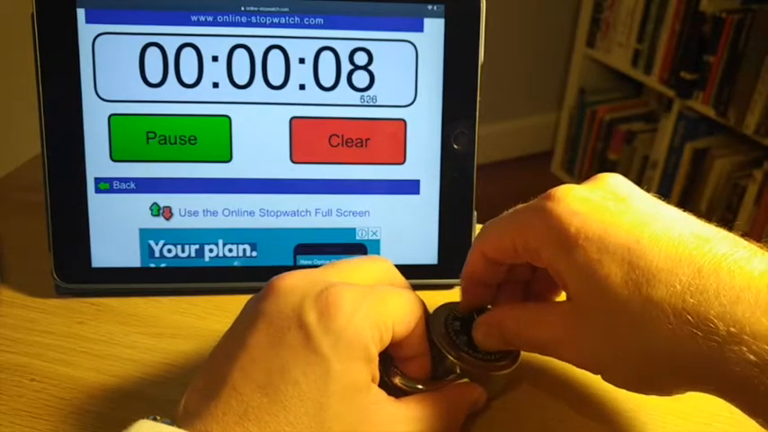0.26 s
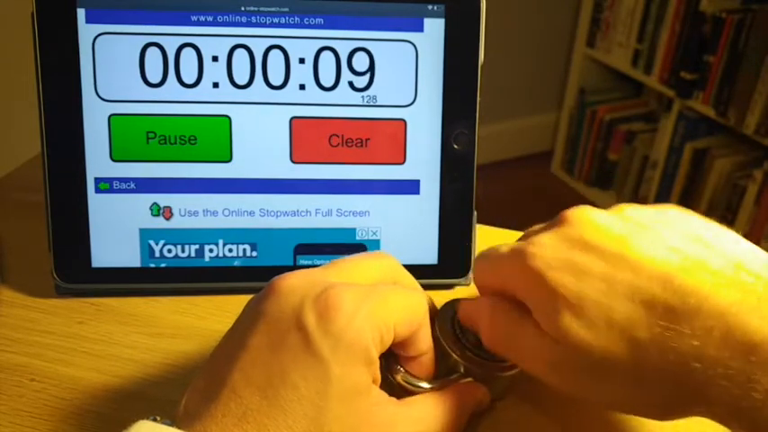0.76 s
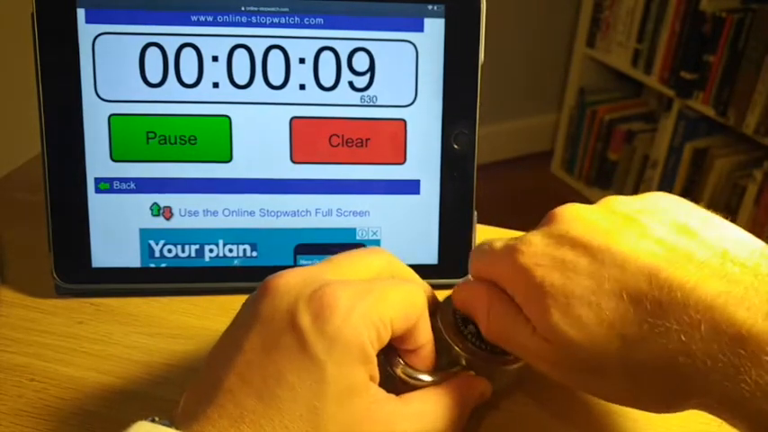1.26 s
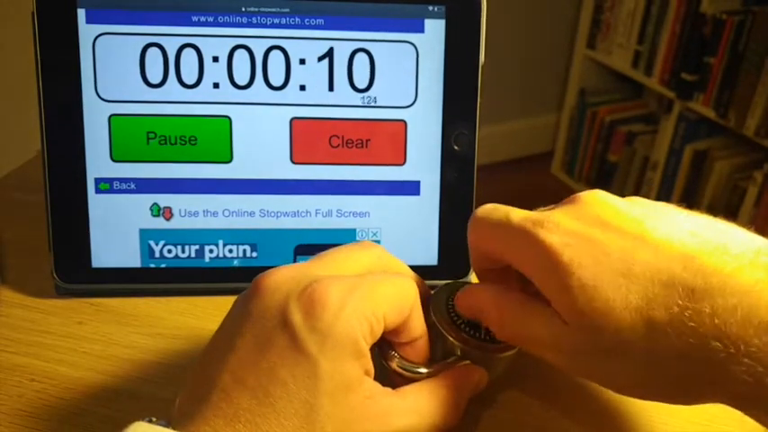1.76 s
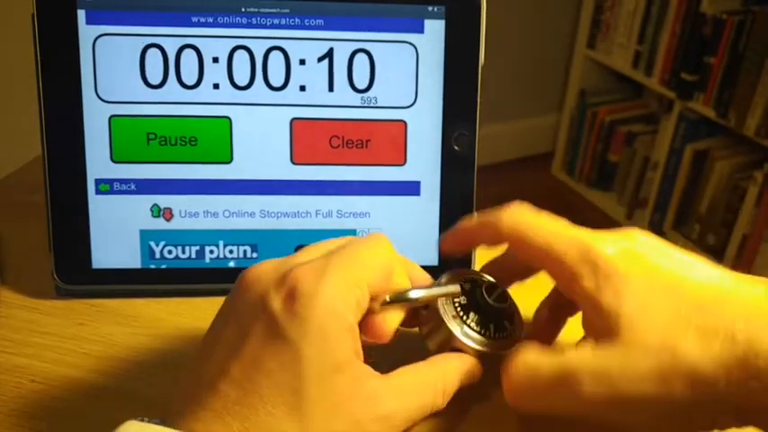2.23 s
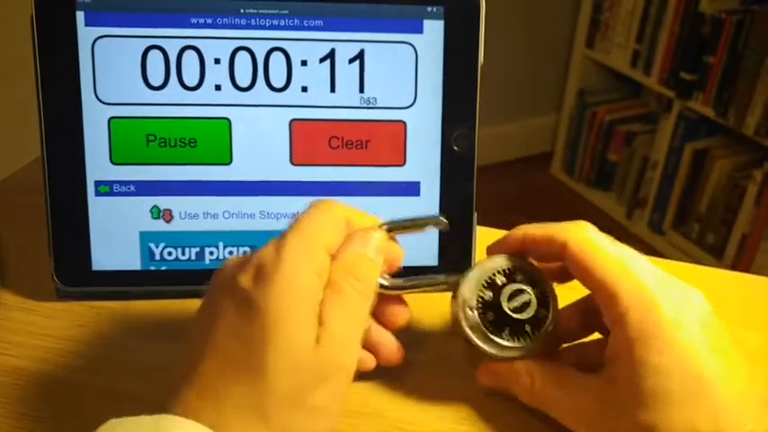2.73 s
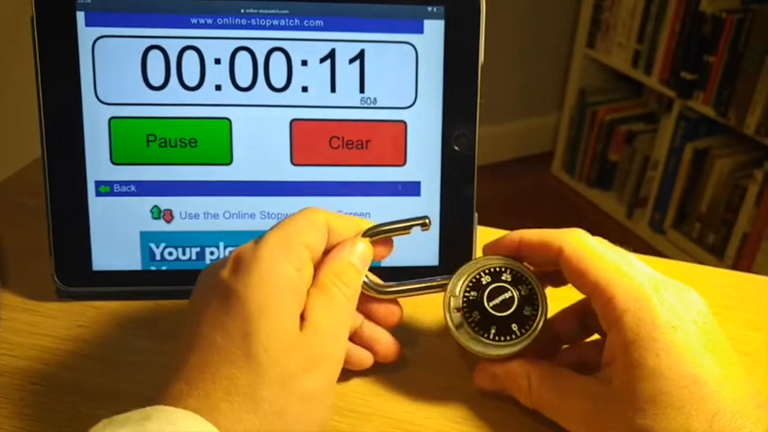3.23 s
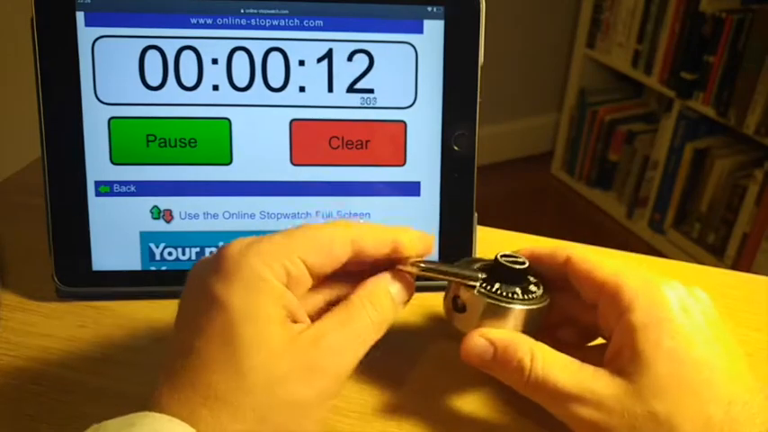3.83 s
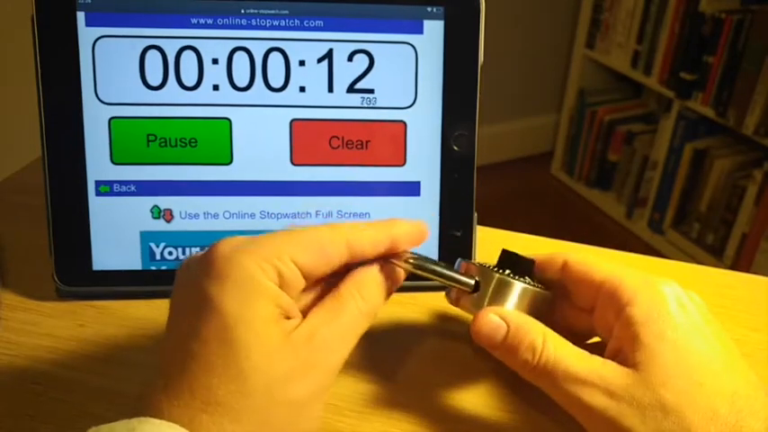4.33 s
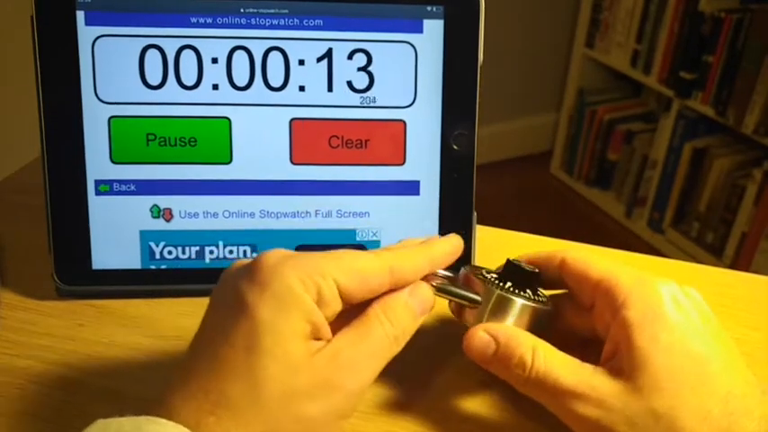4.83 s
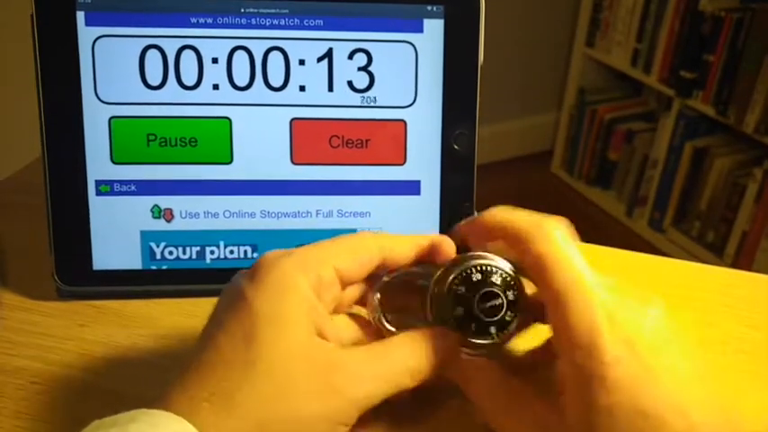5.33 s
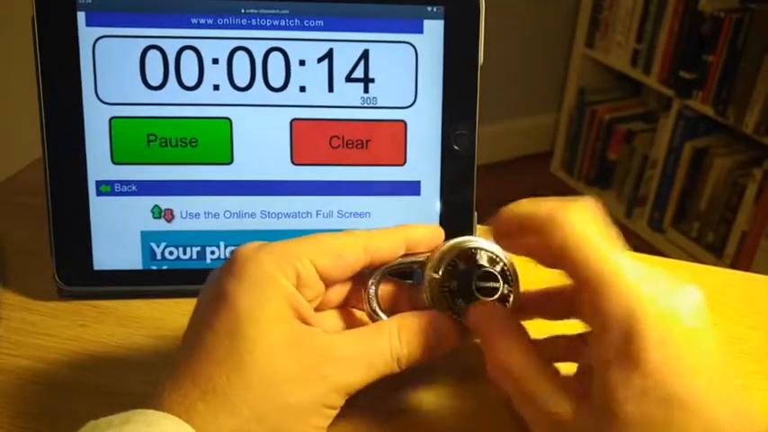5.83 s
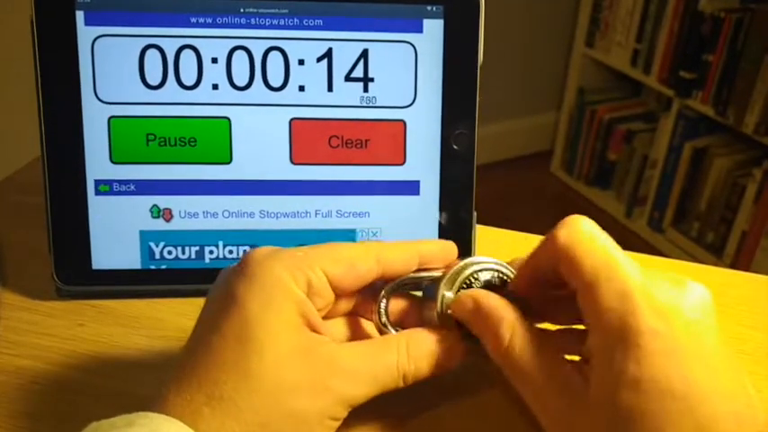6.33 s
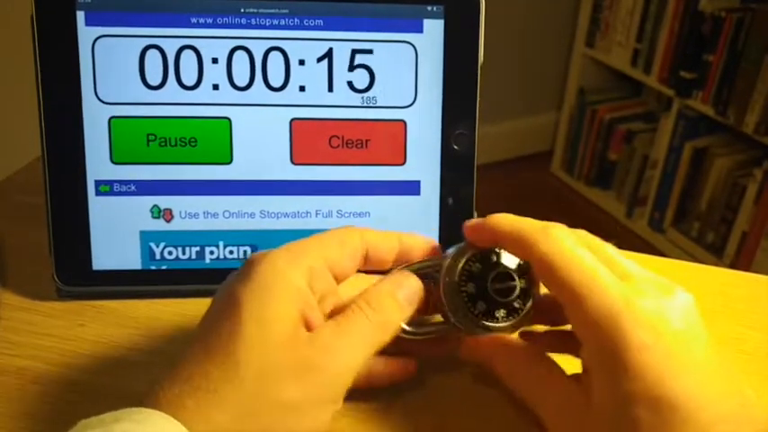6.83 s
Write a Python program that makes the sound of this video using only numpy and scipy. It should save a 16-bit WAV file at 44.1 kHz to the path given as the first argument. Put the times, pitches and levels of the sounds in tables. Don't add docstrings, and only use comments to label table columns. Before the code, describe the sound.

Hands work a combination padlock: dry scrapes, sharp bright clacks, a quiet pause, a ringing tick, a loud snap shut, then busy clicking.

```python
import sys
import numpy as np
from scipy import signal
from scipy.fft import rfft, irfft, next_fast_len
from scipy.io import wavfile
from scipy.ndimage import uniform_filter1d, map_coordinates

SR = 44100
rng = np.random.default_rng(int(sys.argv[2]) if len(sys.argv) > 2 else 0)


def how_loud(loudness_db):
    steps = np.asarray(loudness_db, float) / 20
    return 10 ** steps


def to_wav(s):
    ch = np.atleast_2d(s).T
    pcm = np.round(np.clip(ch, -1, 1) * 32767)
    wavfile.write(sys.argv[1], SR, pcm.astype(np.int16))


N = 312223
TIME = np.arange(N) / SR


def unit(x):
    return x / np.sqrt(np.mean(x ** 2) + 1e-20)


def peak(x):
    return x / np.abs(x).max()


def along(points, hz):
    f, value = np.transpose(points)
    return np.interp(np.log(hz + 1), np.log(f + 1), value)


def over_time(points):
    s, value = np.transpose(points)
    return np.interp(TIME, s, value)


def filtered(x, response):
    n = x.shape[-1]
    padded = next_fast_len(n + 4096)
    spectrum = rfft(x, padded) * response(np.fft.rfftfreq(padded, 1 / SR))
    return irfft(spectrum, padded)[..., :n]


def shaped(x, points):
    return filtered(x, lambda hz: how_loud(along(points, hz)))


def resonances(peaks):
    def response(f):
        total = 0
        for k, (center, width, db) in enumerate(peaks):
            ring = 1j * f * width / (center ** 2 - f ** 2 + 1j * f * width)
            total = total + (-1) ** k * how_loud(db) * ring
        return total
    return response


def strokes(rows):
    out = np.zeros(N)
    for s, rise, t60, db in rows:
        part = out[round(s * SR):round((s + rise + 2 * t60) * SR)]
        t = np.arange(len(part)) / SR
        fall_db = -60 * np.clip(t - rise, 0, None) / t60
        part += how_loud(db + fall_db) * np.clip(t / rise, 0, 1)
    return out


# f/Hz, likeness (1 same, 0 unrelated)
LIKENESS = [(60, 0.76), (180, 1), (550, 0.097), (1650, -0.47), (4970, -0.0021), (15000, -0.15)]


def pair(spectrum):
    def spread(hz):
        turn = np.arccos(np.clip(along(LIKENESS, hz), -1, 1)) / 2
        return spectrum(hz) * [np.cos(turn), np.sin(turn)]
    mid, side = filtered(rng.standard_normal((2, N)), spread)
    return unit(np.array([mid + side, mid - side]))


# f/Hz, level/dB (per Hz)
AIR = [(15, -72), (25, -38.5), (38, -13), (103, -5.5), (187, -12.5), (226, -9.5), (259, -16), (330, -19.5),
       (524, -24), (617, -26), (1510, -31.5), (3200, -37), (6730, -37), (15200, -32.5), (16500, -53.5)]
# f/Hz, width/Hz, level/dB
HUM = [(101.6, 12, -69), (184, 12, -75.5)]
# f/Hz, width/Hz, level/dB
MOTOR = [(108, 2.5, -71), (220.7, 1, -68.5), (330, 1.5, -81)]


def air():
    out = how_loud(-61) * pair(lambda hz: how_loud(along(AIR, hz)))
    for center, width, db in HUM + MOTOR:
        out += how_loud(db) * pair(lambda f: 1 / (1 + ((f - center) / width) ** 4))
    return out


# f/Hz, t60/s
ROOM_DECAY = [(200, 0.59), (700, 0.59), (1800, 0.74), (4800, 0.79), (12000, 0.49)]
# f/Hz, level/dB
ROOM_SHARE = [(300, -8), (1000, -5.5), (2000, -7.5), (4000, -12), (8000, -14.5), (15000, -10.5)]


def room(x, count=12):
    out = np.zeros((2, N + 2 * SR))
    step = N // count + 1
    x = shaped(x, ROOM_SHARE)
    for at in range(0, N, step):
        hz, t, z = signal.stft(rng.standard_normal((2, SR)), SR, nperseg=256)
        decay = how_loud(-60 * t / along(ROOM_DECAY, hz)[:, None])
        tail = signal.istft(z * decay, SR, nperseg=256)[1]
        tail *= 1 - np.exp(-np.arange(tail.shape[1]) / SR / 0.005)
        tail /= np.linalg.norm(tail[0])
        wet = signal.fftconvolve(x[None, at:at + step], tail, axes=1)
        out[:, at:at + wet.shape[1]] += wet
    return out[:, :N]


# t/s, rise/s, fall t60/s, level/dB
SLEEVE = [(2.79, 0.074, 2.1, -62)]
# f/Hz, level/dB (per Hz)
CLOTH = [(500, -10), (1500, 1.5), (3000, -3.5), (7000, -11.5), (16000, -23)]


def sleeve():
    return strokes(SLEEVE) * pair(lambda hz: how_loud(along(CLOTH, hz)))


# t/s, level/dB, f/Hz, t60/s
THUDS = [
    (0.365, -59, 303, 0.061),
    (1.173, -44, 180, 0.13),
    (1.981, -21.5, 194, 0.03),
    (2.566, -46, 215, 0.15),
    (2.642, -54, 202.4, 0.074),
    (4.598, -10, 165.7, 0.038),
    (5.061, -18, 201, 0.023),
    (7.006, -33.5, 206, 0.045),
    (7.049, -19, 241, 0.043),
]


def thuds():
    out = np.zeros(N + SR)
    t = np.arange(SR // 2) / SR
    for s, db, hz, t60 in THUDS:
        boom = np.sin(2 * np.pi * hz * t)
        boom += 0.082 * np.sin(2 * np.pi * 1.9 * hz * t) * how_loud(-60 * t / 0.03)
        out[round(s * SR):][:len(t)] += how_loud(db - 60 * t / t60) * (1 - np.exp(-t / 0.011)) * boom
    return out[:N]


def cupped(s):
    return (s < 2.2) | (s > 5.28)


def shut(s):
    return (s < 2.5) | (s > 4.5)


def opened(hz):
    u = 1j * hz / 960
    return (u * u / (1 + 1.49 * u + u * u)) ** 2


# (f/Hz, width/Hz, level/dB)
FREE_HOLLOW, CUPPED_HOLLOW = (1054, 140, -8), (846, 250, -6)


def patchy(x):
    z = signal.stft(x, nperseg=512)[2]
    field = rng.standard_normal(z.shape[1:])
    field = uniform_filter1d(field, size=7, axis=0)
    field = uniform_filter1d(field, size=6, axis=1)
    wander = how_loud(2.5 * unit(field))
    return unit(signal.istft(z * wander, nperseg=512)[1][:, :N])


# t/s, pressure/dB
PRESSURE = [(0.2, -67.5), (0.45, -57.5), (1.31, -55.5), (1.58, -64), (1.85, -73.5), (2.0, -53.5),
            (2.21, -61.5), (3.4, -73), (3.67, -59), (3.8, -74), (4.11, -77), (4.45, -73), (4.76, -99),
            (4.86, -59), (6.12, -57), (6.4, -63), (6.73, -63), (7.08, -60)]
# t/s, rise/s, fall t60/s, hiss level/dB
SLIDES = [(0.266, 0.052, 0.33, -36.5), (.38, 0.016, 0.2, -58), (.668, 0.013, 0.63, -44.5),
          (1.081, 0.017, 0.1, -44.5), (1.1647, 0.0081, 0.067, -28.5), (1.809, 0.011, 0.3, -35),
          (1.925, 0.015, 0.32, -49.5), (1.967, 0.0081, 0.022, -36), (1.98, 0.0078, 0.12, -70),
          (2.6, 0.052, 0.38, -71), (3.47, 0.031, 0.17, -74.5), (3.624, 0.093, 0.26, -48),
          (3.8, 0.039, .15, -57), (3.896, 0.023, 0.25, -42.5), (4.082, 0.018, 0.022, -35),
          (4.238, 0.0017, 0.037, -27.5), (4.583, 0.013, 0.046, -20), (4.606, 0.0048, 0.27, -30),
          (4.64, 0.055, 0.7, -42.5), (5.275, 0.027, 0.14, -46.5), (5.578, 0.0068, 0.13, -42),
          (5.93, 0.041, 0.026, -43.5), (6.2, 0.063, 0.074, -49.5), (6.468, 0.015, 0.24, -48),
          (6.66, .015, 0.17, -53), (6.9, 0.056, .1, -50), (6.999, 0.0077, 0.046, -31)]
# t/s, rise/s, fall t60/s, level/dB
DRAGS = [
    (.27, 0.052, 0.088, -39),
    (.67, 0.034, 0.085, -43.5),
    (.315, 0.021, 0.055, -39.5),
    (3.63, 0.047, 0.3, -48.5),
    (3.895, 0.011, 0.16, -43),
    (4.238, 0.012, 0.065, -36.5),
    (5.57, 0.03, 0.1, -55),
    (6.24, 0.021, 0.11, -59),
    (6.46, 0.043, 0.54, -61),
]
# t/s, rise/s, fall t60/s, level/dB
SCUFFS = [(0.263, 0.049, 0.15, -39.5), (0.355, 0.0067, 0.11, -33.5), (.555, 0.019, 0.1, -48),
          (.61, 0.0081, 0.36, -52), (.42, 0.028, 0.27, -52.5), (1.649, 0.031, 0.59, -66),
          (1.967, 0.014, 0.023, -51), (2.5, 0.069, 0.35, -67), (4.606, 0.0056, 0.099, -51),
          (5.275, 0.023, 0.061, -62), (5.93, 0.012, 0.056, -55), (6.468, 0.0093, 0.23, -58),
          (7.041, 0.016, 0.062, -45)]
# f/Hz, level/dB (per Hz)
HISS = [(1940, -14), (3300, -7.5), (4090, -8.5), (4560, -2), (5110, -0.5), (7350, -2), (9250, 1.5),
        (11700, -8.5), (14000, -4.5), (15800, -12), (16500, -49)]
# f/Hz, level/dB (per Hz)
GRIND = [(500, -49.5), (650, -18), (800, -8.5), (1050, -10), (1400, -5.5), (1800, -0.5), (2050, -8),
         (2300, -26.5), (3400, -17), (5000, -34.5)]
# f/Hz, width/Hz, level/dB
WOOD = [(215, 180, -1), (434, 50, 6.5), (540, 93, 3), (790, 130, 3.5)]


def rub():
    steady = how_loud(over_time(PRESSURE) - 14) * (TIME > PRESSURE[0][0])
    slides = strokes(SLIDES)
    hiss_gain = steady + slides
    grind_gain = how_loud(3) * steady + how_loud(-11.5) * slides + strokes(DRAGS)

    clump = map_coordinates(rng.standard_normal(N // 150 + 4), [np.arange(N) / 150])
    slip_size = how_loud(2 * clump + 6.7 * rng.standard_normal(N))
    slips = rng.standard_normal((3, 2, N)) * slip_size

    hiss = shaped(slips[0], HISS)
    grind = unit(shaped(slips[1], GRIND))
    hollow = filtered(grind, resonances([(*CUPPED_HOLLOW[:2], 0)]))
    grind = grind + how_loud(-15.5) * cupped(TIME) * hollow
    grind = np.where(shut(TIME), grind, filtered(grind, opened))
    wood = filtered(filtered(slips[2], resonances(WOOD)), resonances(WOOD))
    return hiss_gain * patchy(hiss) + grind_gain * patchy(grind) + strokes(SCUFFS) * unit(wood)


RING_TIMES = [0.365, 1.165, 1.979, 2.434, 2.466, 3.717, 3.73, 4.096, 4.097, 4.098, 4.595, 4.597, 5.055, 5.7,
              5.89, 6.436, 6.484, 6.774, 6.778]
# f/Hz, level/dB, t60/s
RINGS = [(785, -39, .08), (1832, -31.5, 0.11), (925, -45, 0.73), (715, -55, .055), (980, -61, 0.65),
         (1790, -35, 0.043), (9810, -45.5, 0.34), (15250, -36, .28), (790, -32, 0.027), (15350, -16, 0.028),
         (1940, -30, 0.065), (8200, -36, 0.28), (755, -50, .045), (770, -51, 0.054), (755, -46, 0.048),
         (776, -47.5, 0.13), (757, -44, 0.094), (3670, -31, 0.035), (5200, -31, 0.04)]


def rings():
    out = np.zeros(N + SR)
    t = np.arange(SR // 2) / SR
    for s, (hz, db, t60) in zip(RING_TIMES, RINGS):
        cluster = resonances([(hz, 150 + 0.01 * hz, 0)])
        buzz = unit(filtered(filtered(rng.standard_normal(len(t)), cluster), cluster))
        out[round(s * SR):][:len(t)] += how_loud(db - 60 * t / t60) * (1 - np.exp(-t / 0.00093)) * buzz
    return out[:N]


# t/s, level/dB, t60/s
BAR = [
    (3.6565, -27, 0.03),
    (3.908, -40, .05),
    (4.2395, -16, 0.04),
    (4.25, -18, .03),
    (4.2615, -26, 0.03),
    (6.621, -39, 0.024),
]


def bar():
    out = np.zeros(N + SR)
    t = np.arange(SR // 4) / SR
    for s, db, t60 in BAR:
        wobble = np.cumsum(rng.normal(0, 0.11, len(t)))
        tone = np.sin(2 * np.pi * 10590 * t + wobble)
        out[round(s * SR):][:len(t)] += how_loud(db - 60 * t / t60) * (1 - np.exp(-t / 0.00055)) * tone
    return out[:N]


# f/Hz, width/Hz, level/dB
CASE = [(911, 208, -12), (1214, 130, -14), (1826, 227, -6)]
# f/Hz, width/Hz, level/dB
DISCS = [(3650, 160, -5.5), (5135, 160, -6), (5047, 140, 8), (6570, 3250, -1), (7050, 1060, 6)]
# f/Hz, width/Hz, level/dB
PINS = [(9140, 2000, 3.5), (10550, 1700, 5), (12240, 1300, 7.5), (13900, 1600, -0.5), (15780, 1200, 7.5)]


def varied(peaks, chance):
    pitch = 1 + 0.025 * chance[-1]
    return [(f * pitch, width, db + 3 * c) for (f, width, db), c in zip(peaks, chance)]


def clicks(contacts):
    out = np.zeros((2, N + SR))
    lead = 350
    t = (np.arange(SR // 16) - lead) / SR
    after = np.clip(t, 0, None)
    slip = 0.053 * how_loud(60 * np.clip(t, None, 0) / 0.02) * how_loud(-60 * after / 0.0056)
    strike = how_loud(-60 * after / 0.0078) * (1 - np.exp(-after / 0.00089))
    for s, db, knock_db, tick_db, hz in contacts:
        noise = rng.standard_normal((3, 2, len(t)))
        chance = rng.standard_normal((3, 8))
        uneven = np.repeat(rng.standard_normal(len(t) // 40 + 1), 40)[:len(t)]
        chatter = 0.1 * how_loud(6.5 * uneven) * how_loud(-60 * after / 0.033) * (t > 0)
        force = noise * (slip + strike + chatter)

        struck = [(hz, 1000, 1)] + varied(DISCS, chance[0])
        part = peak(filtered(force[0], resonances(struck)))
        tick = peak(filtered(force[1], resonances(varied(PINS, chance[1]))))
        hollow = CUPPED_HOLLOW if cupped(s) else FREE_HOLLOW
        knock = filtered(force[2], resonances([hollow] + varied(CASE, chance[2])))
        if not shut(s):
            knock = filtered(knock, opened)
        sound = part + how_loud(tick_db + 10) * tick + how_loud(knock_db + 3.5) * peak(knock)
        at = round(s * SR) - lead
        out[:, at:at + len(t)] += how_loud(db) * sound
    return out[:, :N]


# t/s, level/dB, case knock/dB, bright tick/dB
LEVER = [(0.6128, -41, 8.5, -4), (0.9377, -28, -15.5, -13), (1.8246, -16.5, -10.5, -21),
         (2.4332, -27, -24, -15), (2.6277, -49.5, -3.5, -8), (2.6866, -49, -5, -22),
         (2.8278, -48, -4, -26.5), (3.383, -55.5, -4, -22), (3.49, -61, 8, -29), (3.531, -62.5, 11, -24),
         (3.7218, -21, -13.5, -3), (3.8819, -39, -18, 8), (3.9078, -22, -21, -11), (4.249, -18.5, -17, -24),
         (4.2623, -21.5, -12.5, -6), (4.3374, -37.5, -2, -40), (5.055, -19, -14, -14),
         (5.2042, -28.5, -16.5, -13), (5.257, -23.5, -16, -15), (5.289, -23.5, -14.5, -7),
         (5.3111, -48, -7, 10), (5.6538, -33.5, -16, -15), (6.435, -17.5, -13.5, -2.5),
         (6.774, -16, -20.5, -11.5), (6.7976, -43, -28, 12), (6.825, -28.5, -17.5, -18),
         (6.9165, -32, -33, -34), (6.9268, -21, -18, -14), (7.003, -22, -40, -11)]
# t/s, level/dB, case knock/dB, bright tick/dB
DISCS_ON_TABLE = [(0.239, -43, 5, -29), (0.3151, -32, -8, 4.5), (0.3243, -32.5, 3, 2),
                  (0.365, -21, -4.5, -5.5), (0.5775, -46.5, -0.5, -4), (0.696, -25, -24, -45.5),
                  (0.768, -39, -24, -6), (1.0067, -22, -15.5, -10.5), (1.0908, -27, -7.5, -25),
                  (1.1757, -5, -21, -12), (1.206, -23.5, -17.5, -27), (1.8237, -30, -13, 0),
                  (1.9327, -32.5, -6.5, -11), (1.9789, -7, -17, -9.5), (1.9832, -25, -40, -6.5),
                  (2.4648, -22.5, -10.5, -19), (3.415, -44.5, -2, -42), (4.029, -20.5, -15, -23),
                  (4.0978, -10.5, -17.5, -9), (4.43, -31.5, -31, -22), (4.554, -24, -9, -10.5),
                  (4.5942, -1, -31, -3.5)]
# t/s, level/dB, case knock/dB, bright tick/dB
DISCS_IN_HAND = [(5.4624, -12, -27, -15.5), (5.4702, -29, -15, -10), (5.5934, -26, -19, -16),
                 (5.6989, -19.5, -16, -12), (5.7364, -51.5, -3, 9), (5.7627, -37, -6.5, -25),
                 (5.864, -38, -17, -11), (5.886, -18, -25.5, -13.5), (5.9861, -30.5, -7, 2.5),
                 (6.1653, -27.5, -22, -19), (6.1786, -35, -5, -1.5), (6.314, -32, -7, -14),
                 (6.335, -27, -11.5, -11), (6.5481, -28.5, -11.5, -29), (6.563, -32, -8, -31),
                 (6.6212, -41.5, -28, -3), (6.66, -37, -29, -13), (6.7782, -28, -14, -9),
                 (6.944, -23.5, -27, -6), (6.9921, -36, -23, 2), (7.038, -29, -32, -8)]
# t/s, level/dB, case knock/dB, bright tick/dB
SHACKLE = [(0.7602, -26, -16, -7), (1.1162, -29.5, -19.5, -27), (1.1806, -12, -43, -28.5),
           (3.6165, -40.5, -9, 0.5), (3.6574, -51, 1, -10), (3.6992, -31, -20, -20),
           (3.7172, -15, -9.5, -17.5), (3.9407, -29, -5, 0), (3.969, -33, -33, -23),
           (4.238, -16.5, -43.5, -7), (6.0485, -29.5, -20, -31), (6.478, -22.5, -17, -9)]
STRUCK_PITCH = [4004, 5040, 4830, 6660]
# t/s, level/dB, case knock/dB, bright tick/dB,
# f/Hz
MORE_CONTACTS = [(0.2826, -38, -2, -1, 9040), (0.2976, -33.5, -19, -6.5, 9150), (0.31, -33, -5.5, -5.5, 5270),
                           (0.334, -37, -3, -10, 5000), (0.5645, -43.5, 3.5, -13, 4900), (0.6862, -31.5, -5, -10, 4430),
                           (0.9325, -41.5, -6, -9, 5390), (1.105, -37.5, -6, -21, 6760), (1.196, -34.5, -16, 5, 9000),
                           (1.846, -26, -10, -16, 4300), (1.9205, -37, -21, -8, 5320), (1.9405, -30, -9, -16, 5100),
                           (1.9555, -38, -1, -9.5, 5700), (3.633, -37, -13, -14, 6500), (3.725, -18.5, -13, -14.5, 6600),
                           (3.846, -48, 4.5, -20, 4400), (3.8785, -45, -17, 1, 6500), (3.899, -40.5, -3, -7, 6540),
                           (4.0885, -33, -30, -3, 10700), (4.0938, -32, -5, 1, 11800), (4.415, -52, -20, -1, 12000),
                           (4.589, -10, -6, -18, 6400), (4.612, -13.5, -26, -6.5, 6600), (5.0585, -25.5, -24, -4, 4420),
                           (5.252, -33, -24, -3, 3860), (5.2763, -40, -6, -13, 3740), (5.283, -27, -16, -14.5, 4600),
                           (5.298, -31, -9, -6, 4600), (5.8895, -44, -22, -7, 4800), (5.989, -22.5, -21, -12, 7600),
                           (6.1625, -28.5, -22, -7, 4500), (6.3375, -35, -20, -16, 4500), (6.4315, -37, -28, -13, 4530),
                           (6.438, -26.5, -24, -5, 3930), (6.446, -41, -4, -15, 4800), (6.455, -40, 1, -15, 4200),
                           (6.4845, -31.5, -5, 0, 4830), (6.939, -28.5, -22, 0.5, 4400), (6.9965, -35, -22, 10.5, 4000),
                           (7.023, -35, -10, -10, 4400),
                           (0.2787, -38, 0, -7, 9300), (0.731, -46, -9, -13.5, 5000), (2.424, -47.5, 5, -25, 4500),
                 (2.543, -56, 2, -25, 4500), (2.736, -55, -3, -25, 4800), (3.605, -58.5, 3, -20, 4980),
                 (3.652, -47, 2, -20, 5000), (3.929, -48, 2, -18, 5000), (3.951, -54, -6, -18, 5000),
                 (4.0982, -17.5, -37, -5, 14600), (4.126, -50, 0, -20, 5000), (4.168, -50, 1, -20, 5030),
                 (4.187, -46, 4, -20, 5000), (4.429, -41, 2.5, -20, 4000), (4.46, -54, 0, -20, 5000),
                 (6.247, -48, 2, -20, 5000), (6.4355, -25, -30, -8.5, 13000), (6.497, -37.5, -6, -11, 5000)]
# t/s, left-right level/dB
PLACE = [(0, 1), (1.2, -2.5), (1.9, -1), (3.2, 3), (3.7, -1.5), (4.2, 0), (4.6, -1.5), (5.5, 0), (6.3, 0),
         (7.08, 1)]
# f/Hz, left-right level/dB
TILT = [(60, 12.5), (240, -0.5), (950, 2.5), (3770, 1), (8000, -2), (15000, 6)]
# f/Hz, lead/radians
LEAD = [(150, 0.079), (600, 0.25), (1500, 0.42), (2700, 2), (5000, 1.01), (8000, 1.87), (11600, 1.47),
        (15000, 3.3)]
# f/Hz, level/dB
APART = [(200, -34), (700, -8), (2000, -9.5), (6000, -19), (10000, -16), (14000, -0.5)]


def scene():
    contacts = []
    for rows, pitch in zip([LEVER, DISCS_ON_TABLE, DISCS_IN_HAND, SHACKLE], STRUCK_PITCH):
        contacts += [(*row, pitch) for row in rows]
    lock, faces = clicks(contacts + MORE_CONTACTS) + rub()
    lock = lock + rings() + bar()

    half = np.array([[0.5], [-0.5]])
    left_right = 2 * half

    def ports(hz):
        return how_loud(half * along(TILT, hz)) * np.exp(1j * half * along(LEAD, hz))

    apart = left_right * shaped(faces, APART)
    near = filtered((lock + apart) * how_loud(half * over_time(PLACE)), ports)
    table = thuds()
    mid, side = room(0.8 * lock + 0.71 * np.roll(faces, 130) + 1.85 * table)
    side = left_right * filtered(side, lambda hz: 1 / (1 + (450 / (hz + 1)) ** 2))
    return near + table + mid + side + air() + sleeve()


def low_pass(x):
    return signal.sosfilt(signal.butter(12, 16970, fs=SR, output="sos"), x)


# f/Hz, level/dB
PORT_COLOUR = [(2000, -2), (2400, 1.5), (3350, 2), (3600, 6.5), (4000, 2), (4150, 3.5), (4350, 0.5),
               (7000, -2), (7500, 4), (8100, 0), (15500, -3)]
# f/Hz, width/Hz, depth (0-1)
DIPS = [(3530, 320, 0.3), (4080, 143, 0.43), (7423, 500, 0.8), (12950, 700, .3)]


def record(dry):
    def ports(f):
        response = how_loud(along(PORT_COLOUR, f))
        for center, width, depth in DIPS:
            ring = 1j * f * width / (center ** 2 - f ** 2 + 1j * f * width)
            response = response * (1 - np.clip(depth, 0, 1) * ring)
        return response

    heard = filtered(dry, ports)
    heard = heard / (1 + np.abs(heard / 0.75) ** 6) ** (1 / 6)
    heard = filtered(heard, lambda hz: hz ** 2 / (hz ** 2 + 30 ** 2) / (1 + (hz / 16000) ** 60))
    return low_pass(heard)


dry = scene()
out = record(dry)
to_wav(out)
```